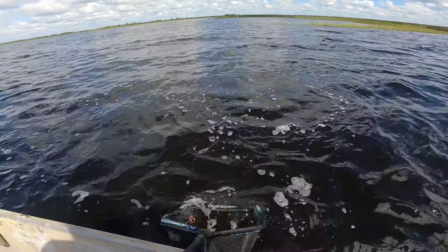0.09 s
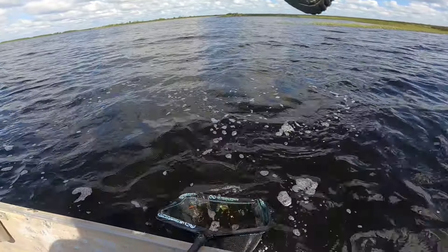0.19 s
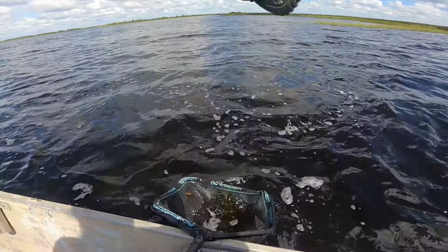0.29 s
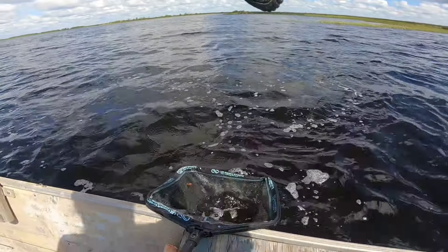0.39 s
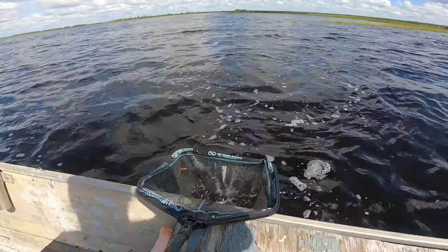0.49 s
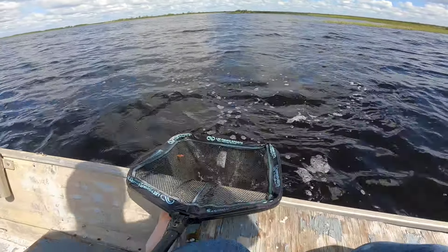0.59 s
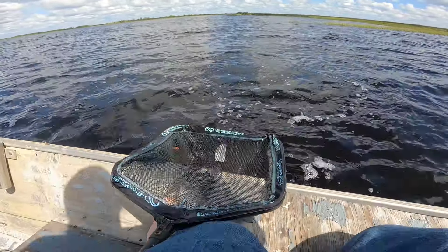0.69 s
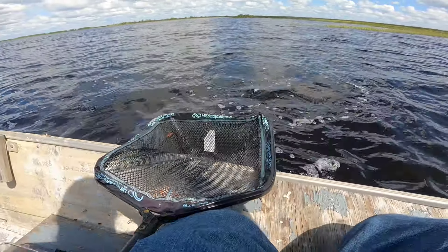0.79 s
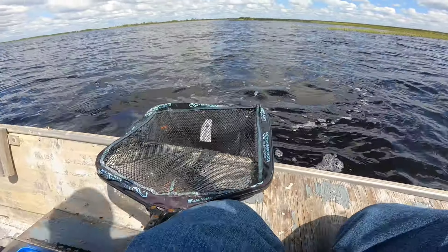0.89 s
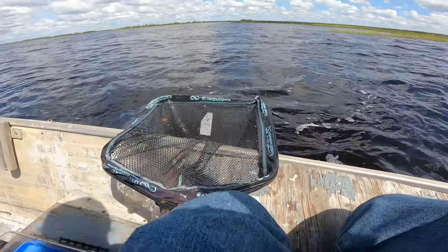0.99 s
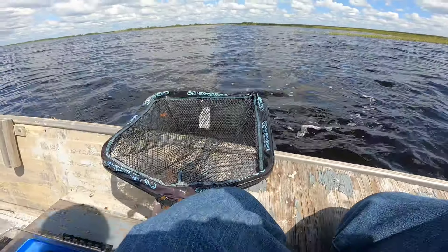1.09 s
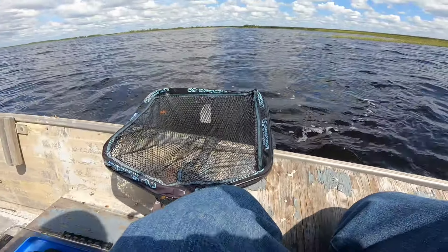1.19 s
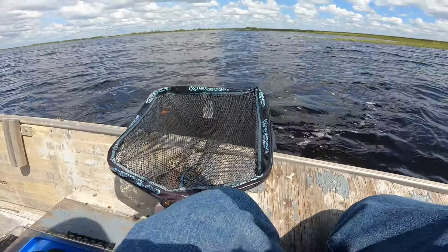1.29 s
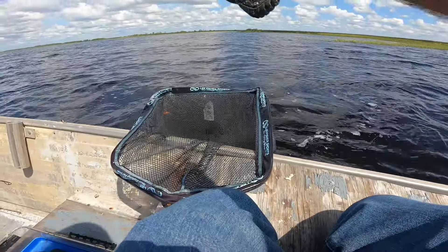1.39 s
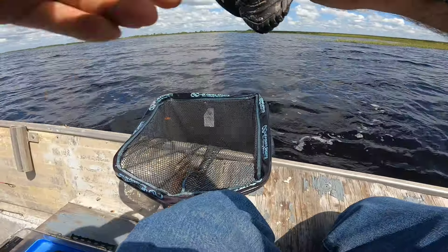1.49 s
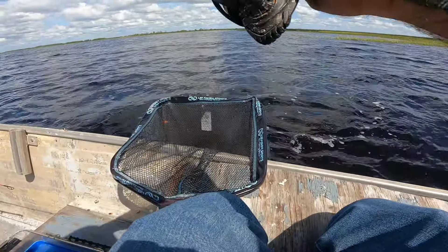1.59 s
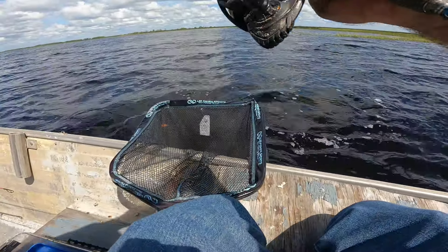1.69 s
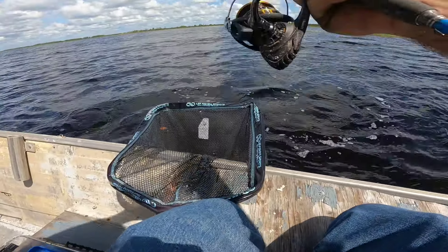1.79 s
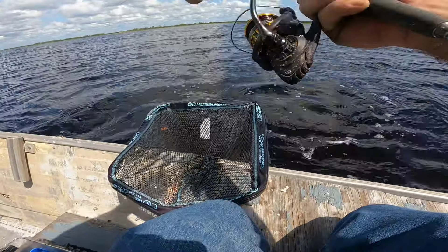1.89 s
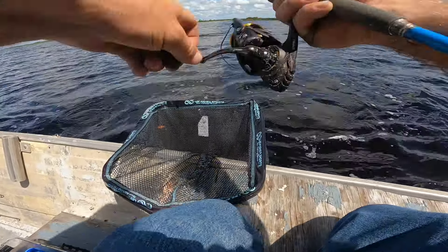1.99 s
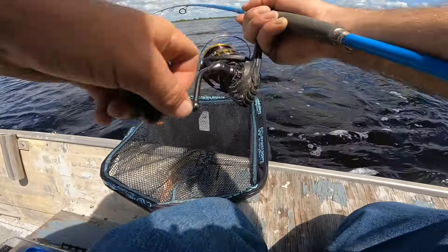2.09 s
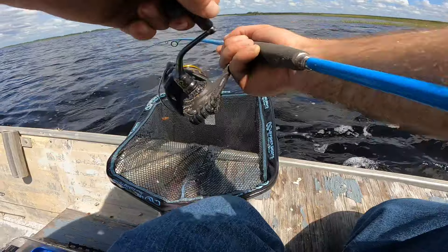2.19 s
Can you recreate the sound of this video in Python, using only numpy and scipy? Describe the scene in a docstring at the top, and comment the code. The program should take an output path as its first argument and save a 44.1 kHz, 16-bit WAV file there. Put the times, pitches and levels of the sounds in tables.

```python
"""On a small wooden boat, a landing net with a fish in it is dragged in over the rail, close by.
The hull rumbles on the water. The handle scrapes, water runs off the net and the wet mesh slaps.
The hoop knocks across the rail and the fish thumps and bounces on the deck, making the wood ring.
Then a fishing reel clicks and is wound, its gears rubbing and catching."""
import sys
import numpy as np
from scipy import signal
from scipy.fft import rfft, irfft
from scipy.io import wavfile

SR = 44100
rng = np.random.default_rng(int(sys.argv[2]) if len(sys.argv) > 2 else 0)


def master_out(mix):
    """Clip the mix to full scale and print it as 16-bit PCM to the path in sys.argv[1]."""
    frames = np.transpose(np.atleast_2d(mix))
    ceiling = np.clip(frames, -1, 1)
    pcm = np.round(ceiling * 32767).astype(np.int16)
    wavfile.write(sys.argv[1], SR, pcm)


N = 97020  # 2.2 seconds


def undb(db):
    """Turn decibels into a number to multiply by."""
    return 10 ** (np.asarray(db) / 20)


def unit(x):
    """Scale a sound to an average (rms) level of 1."""
    return x / np.sqrt(np.mean(x ** 2) + 1e-18)


def clock():
    """The time of every sample, in seconds."""
    return np.arange(N) / SR


def curve(rows):
    """Join (seconds, dB) points into a volume curve, silent before the first."""
    return undb(np.interp(clock(), *np.array(rows).T, left=-200))


def colour(x, points, tilt_db=0):
    """Shape the tone by (Hz, dB) points; a tilt above 0 dB per octave brightens it."""
    octave = np.log2(np.maximum(np.fft.rfftfreq(len(x), 1 / SR), 1))
    hz, db = np.array(points).T
    gain_db = np.interp(octave, np.log2(hz), db) + tilt_db * (octave - 10)
    return irfft(rfft(x) * undb(gain_db), len(x))


def band(x, low_hz, high_hz):
    """Gently turn down everything below low_hz and above high_hz."""
    for hz, kind in ((low_hz, "high"), (high_hz, "low")):
        x = signal.sosfilt(signal.butter(2, min(hz, SR / 2 - 10), kind, fs=SR, output="sos"), x)
    return x


def add(out, start, x):
    """Mix a sound in at a time in seconds."""
    i = max(int(start * SR), 0)
    out[i:i + len(x)] += x[:max(N - i, 0)]


def grains(per_s, spread_db):
    """Tiny impacts of uneven size at random times."""
    hits = (rng.random(N) < per_s / SR) * rng.standard_normal(N)
    return unit(hits * undb(spread_db * rng.standard_normal(N)))


def fade(t, ring_s):
    """Die away by 60 dB over the ring time."""
    return np.exp(-np.log(1000) * t / max(ring_s, 1e-4))


def ring(notes):
    """One tap rings an object's own notes; neighbouring notes swing opposite ways."""
    t = clock()[:N // 3]
    return unit(sum((-1) ** k * undb(db) * np.sin(2 * np.pi * hz * t) * fade(t, ring_s)
                    for k, (hz, db, ring_s) in enumerate(notes)))


def pings(count, start, end, db, low_hz, high_hz, cycles, glide=0):
    """Short notes at random times and pitches; glide bends them upward, like a bubble's note."""
    out, t = np.zeros(N), clock()[:N // 10]
    for k, (when, pitch, size) in enumerate(rng.random((count, 3))):
        hz = low_hz * (high_hz / low_hz) ** pitch
        life = cycles / hz
        phase = 2 * np.pi * hz * (t + glide * np.minimum(t, life) ** 2 / life / 2)
        note = np.sin(phase) * fade(t, life) * (1 - fade(t, life / 10))
        add(out, start + (end - start) * (k + when) / count, undb(db) * 2 * size * note)
    return out


# The tone of the water and of the hull's rumble. Each row: frequency in Hz, level in dB.
WATER_TONE = [(20, 6), (60, 1.5), (130, 6.5), (250, 4.5), (500, -12.5), (1000, -25), (2000, -18),
              (4000, -31), (8000, -40), (10000, -35), (15500, -66)]
RUMBLE_TONE = [(15, 6.5), (30, -7), (55, -5.5), (90, 0.5), (160, -13), (400, -28.5), (2000, -94)]
# Swells nudging the hull. Each row: middle in seconds, level in dB, pitch in Hz, fade time in seconds.
HULL_NUDGES = [(0.04, -36, 36.6, 0.018), (0.569, -40, 74.6, 0.069), (1.675, -35.5, 49, .025),
               (1.747, -29, 47, 0.014), (1.849, -36, 37, 0.017), (1.973, -35, 84.5, 0.0086)]

def hull():
    """The hull rumbles on faintly washing water, and swells give it a few soft nudges."""
    t = clock()
    out = undb(-58) * unit(colour(rng.standard_normal(N), WATER_TONE))
    out += undb(-47) * unit(colour(rng.standard_normal(N), RUMBLE_TONE))
    for middle, db, hz, fade_s in HULL_NUDGES:
        shape = np.exp(-((t - middle) / fade_s) ** 2)
        out += undb(db) * np.sqrt(2) * np.sin(2 * np.pi * hz * (t - middle)) * shape
    return out


# The tone of water streaming off the net. Each row: frequency in Hz, level in dB.
STREAM_TONE = [(120, -6), (200, 0), (249, -1), (315, 0.5), (940, -8.5), (1010, -12), (1260, -11.5),
               (3250, -15), (6480, -26), (15500, -59)]
# How loud the stream is. Each row: time in seconds, level in dB.
STREAM_LEVEL = [(0.3, -49.5), (0.48, -41), (0.58, -42), (0.68, -37), (0.79, -36.5), (0.85, -45),
                (0.96, -51.5), (1.15, -54), (1.38, -64), (1.7, -53.5), (1.88, -52.5)]

def runoff():
    """Water gurgles round the rising net, streams from it and thins to drops."""
    gurgle = pings(count=20, start=0, end=0.27, db=-31, low_hz=400, high_hz=1923, cycles=147, glide=0.11)
    drips = pings(count=20, start=0.91, end=0.98, db=-60,
                  low_hz=870, high_hz=6400, cycles=42, glide=0.13)
    stream = unit(colour(grains(per_s=10000, spread_db=0.43), STREAM_TONE))
    return gurgle + drips + stream * curve(STREAM_LEVEL)


# The tone of the rubbing gears. Each row: frequency in Hz, level in dB.
GEAR_TONE = [(60, -11), (130, 0.5), (280, -6), (500, -15.5), (1400, -14), (1900, -10.5), (2900, -11),
             (4000, -11.5), (5000, -16), (6400, -31.5), (7600, -29), (8600, -25.5), (9250, -30),
             (10200, -36.5), (15500, -45)]
# The notes of the reel's body. Each row: pitch in Hz, level in dB, ring time in seconds.
REEL_NOTES = [(2490, 7, 0.048), (2860, -6, 0.058), (2820, 10.5, 0.11), (3040, 7, 0.077), (3280, -13, .06),
              (3370, -12, 0.025), (4360, -16, 0.03)]
# How loud the gears rub and the body rings. Each row: time in seconds, level in dB.
GEAR_LEVEL = [(1.87, -83), (1.90, -48), (1.99, -39), (2.05, -41.5), (2.12, -43.5), (2.19, -38.5)]
REEL_BODY_LEVEL = [(1.88, -65), (1.895, -46), (1.93, -43), (1.97, -45), (2.04, -45.5), (2.12, -48),
                   (2.19, -47)]

def reel():
    """The gears rub unevenly and ring the reel's body; teeth catch and small metal parts tinkle."""
    flutter = undb(unit(band(rng.standard_normal(N), 24, 88)))  # the level wavers by about 1 dB
    rub = unit(grains(per_s=15000, spread_db=0.91) * flutter)
    grit = undb(-6.5) * grains(per_s=350, spread_db=1.9)
    gears = unit(colour(rub + grit, GEAR_TONE))
    body = unit(signal.fftconvolve(grains(per_s=1500, spread_db=3.4), ring(REEL_NOTES))[:N])
    teeth = pings(count=30, start=1.92, end=2.2, db=-37, low_hz=2350, high_hz=4700, cycles=26)
    tinkle = pings(count=10, start=1.92, end=2.2, db=-51, low_hz=7800, high_hz=9700, cycles=150)
    return gears * curve(GEAR_LEVEL) + body * curve(REEL_BODY_LEVEL) + teeth + tinkle


# Clicks of the hoop, reel and tackle, and one faint high tick of a drip. Each row: start in seconds,
# peak level in dB, pitch in Hz, ring time in seconds, how much louder the snap is than the rattle in dB.
SMALL_CLICKS = [(0.395, -22.5, 1980, 0.019, -2), (0.457, -19.5, 3220, 0.0061, -15),
                (0.4565, -21.5, 5630, 0.013, 4), (0.5793, -53, 11100, .008, 0),
                (0.8085, -25.5, 2410, 0.024, -7), (0.940, -41, 2950, 0.022, 6),
                (1.0256, -21, 3520, 0.022, -4), (1.140, -33, 2790, 0.023, 8), (1.623, -46, 3520, 0.024, 7),
                (1.68, -38.5, 5140, 0.027, -5), (1.6925, -30, 3000, 0.017, -13),
                (1.7131, -31, 5170, 0.016, -1.5), (1.726, -27, 2494, 0.018, -2),
                (1.854, -31, 2450, 0.011, 4), (1.8917, -25.5, 2700, 0.015, 11),
                (1.903, -31, 2720, 0.022, 11), (1.915, -27, 2700, 0.029, 3),
                (1.9267, -23.5, 2710, 0.022, 18), (1.9613, -30.5, 2730, .025, 10),
                (2.021, -27.5, 3870, 0.023, 3), (2.032, -16, 3530, 0.008, -1.5),
                (2.033, -28, 7560, 0.004, 3), (2.059, -34, 9100, 0.028, -6.5),
                (2.1705, -26.5, 2720, 0.015, -9)]

def clicks():
    """The hoop, reel and tackle click and one drip ticks, each a pitched snap with a brief rattle."""
    out, t = np.zeros(N), clock()[:N // 20]
    rise_s = 0.00053
    for start, db, hz, ring_s, snap_db in SMALL_CLICKS:
        shape = fade(t, ring_s) * (1 - np.exp(-(t / rise_s) ** 2))
        rattle = band(rng.standard_normal(len(t)) * shape, hz * 0.63, hz * 0.65)
        rattle = unit(band(rattle, hz * 0.66, 4600))
        snap = unit(np.sin(2 * np.pi * hz * t) * shape)
        click = rattle + undb(snap_db) * snap
        add(out, start, undb(db) * click / np.abs(click).max())
    return out


# The notes of the handle on the rail. Each row: pitch in Hz, level in dB, ring time in seconds.
HANDLE_NOTES = [(236, -1, 0.15), (388, -1, 0.089), (460, -6.5, 0.12), (535, -8.5, 0.19), (567, -8.5, .13),
                (941, -11, 0.2), (994, -0.5, 0.13), (1449, -8.5, 0.094), (1550, -19.5, 0.088),
                (1673, -20.5, 0.29), (1797, -18.5, 0.061)]
# The tone of its scrape. Each row: frequency in Hz, level in dB.
SCRAPE_TONE = [(60, -47.5), (130, -4.5), (190, -17), (250, 1), (310, -13.5), (400, -6.5), (580, -10),
               (790, -20), (1020, -7.5), (1200, -17.5), (1490, -15.5), (2230, -28.5), (3100, -28.5),
               (5500, -41.5), (6100, -29.5), (6900, -40.5), (7600, -32), (9000, -51), (12000, -55),
               (15500, -79)]
# How loud it scrapes and rings; the ring grows with the load. Each row: time in seconds, level in dB.
HANDLE_SCRAPE_LEVEL = [(0, -33.5), (0.06, -32.5), (0.16, -33), (0.26, -35), (0.30, -37), (0.36, -44.5),
                       (0.46, -60), (0.56, -70), (0.7, -59)]
HANDLE_RING_LEVEL = [(0, -53), (0.06, -36.5), (0.15, -35), (0.20, -31.5), (0.27, -25), (0.31, -45),
                     (0.36, -47.5), (0.46, -38.5), (0.56, -50.5), (0.7, -86)]

def handle():
    """The handle sticks and slips over the rail in tiny jerks that set it ringing."""
    body = unit(signal.fftconvolve(grains(per_s=900, spread_db=0.81), ring(HANDLE_NOTES))[:N])
    scrape = unit(colour(grains(per_s=12000, spread_db=0.33), SCRAPE_TONE))
    return scrape * curve(HANDLE_SCRAPE_LEVEL) + body * curve(HANDLE_RING_LEVEL)


# Slaps of the wet mesh. Each row: loudest moment in seconds, level in dB, rise time in seconds,
# fall time in seconds, tilt towards the treble in dB per octave.
MESH_SLAPS = [(0.015, -38, 0.0037, 0.011, 13), (0.261, -33.5, 0.0039, 0.028, 0.5),
              (0.366, -24, .002, 0.027, -4.5), (0.393, -27, 0.0051, 0.017, 4),
              (0.462, -20.5, 0.0074, 0.011, 3), (0.81, -33.5, 0.0035, 0.0078, 4.5),
              (1.0276, -24, 0.0058, 0.012, 3.5), (1.245, -61, 0.016, 0.051, 6),
              (1.434, -31.5, 0.0064, 0.019, 1), (1.4665, -28, 0.00084, 0.017, 3)]
# The tone of the mesh. Each row: frequency in Hz, level in dB.
MESH_TONE = [(100, -19.5), (500, 10.5), (1100, 6), (2000, -4.5), (3300, -5), (4500, -15), (6000, -16),
             (8000, -23.5), (10000, -43), (13000, -47.5), (16000, -66)]
# The notes of the net's hoop. Each row: pitch in Hz, level in dB, ring time in seconds.
HOOP_NOTES = [(1103, -4, 0.17), (1248, 2, 0.13), (1517, 2, 0.082), (1838, 2.5, 0.1), (2177, 4, 0.036),
              (2413, -3, 0.099), (2980, -7, .07), (3286, 2, 0.036), (4180, -3, 0.028), (5920, -7, .05)]

def mesh():
    """Wet netting bunches and slaps in bursts of tiny clicks, and shakes the hoop into ringing."""
    slaps, shake, t = np.zeros(N), np.zeros(N), clock()
    for crest, db, rise, fall, tilt_db in MESH_SLAPS:
        shape = undb(db) * np.exp(-np.maximum((crest - t) / rise, (t - crest) / fall))
        slaps += shape * unit(colour(grains(per_s=14000, spread_db=0.56), MESH_TONE, tilt_db))
        shake += shape
    hoop = ring(HOOP_NOTES)
    taps = shake * grains(per_s=2700, spread_db=1)
    return slaps + undb(-10.5) * signal.fftconvolve(taps, hoop / np.linalg.norm(hoop))[:N]


def through_planks(x, path_m):
    """A blow travels as a bend in the wood: below corner_hz, the lower the note, the later it arrives."""
    corner_hz, delay_s_per_m = 1492, 0.00614
    size = 2 * len(x)
    hz = np.maximum(np.fft.rfftfreq(size, 1 / SR), 20)
    delay_s = path_m * delay_s_per_m * np.maximum(np.sqrt(corner_hz / hz) - 1, 0)
    phase = 2 * np.pi * np.cumsum(delay_s) * SR / size
    return irfft(rfft(x, size) * np.exp(-1j * phase), size)[:len(x)]


# The hull's many notes, so close together that they blur. Each row: frequency in Hz, level in dB.
HULL_BLUR_TONE = [(40, 8), (100, 13.5), (250, 13), (500, 5), (1000, -1.5), (2000, -34), (5000, -29.5),
                  (16000, -48)]

def blows(rows, notes, push_db, blur_db):
    """Each blow sends a first push through the wood, then rings its notes and the hull's blur of notes."""
    out, t = np.zeros(N), clock()[:N // 3]
    push_hz, blur_rise_s = 313, 0.0012
    fade_in_s = 0.0008  # a brief fade-in keeps each blow's start smooth
    push = unit(np.sin(2 * np.pi * push_hz * t) * fade(t, ring_s=0.0038))
    wood = ring(notes) + undb(push_db) * push
    for start, db, low_hz, high_hz, path_m in rows:
        blur = colour(rng.standard_normal(len(t)), HULL_BLUR_TONE)
        blur = unit(blur * fade(t, ring_s=0.32) * (1 - np.exp(-t / blur_rise_s)))
        blow = band(wood + undb(blur_db) * blur, low_hz, high_hz)
        blow = through_planks(blow, path_m) * (1 - np.exp(-(t / fade_in_s) ** 2))
        peak = np.abs(signal.hilbert(blow)).max()
        add(out, start, undb(db) * blow / peak)
    return out


# The notes of the rail. Each row: pitch in Hz, level in dB, ring time in seconds.
RAIL_NOTES = [(74.4, -8.5, 0.66), (99, -16.0, 0.5), (156.34, -3.5, 0.63), (233, 6, 0.13), (263, -4.5, 0.15),
              (291.3, -7.5, 0.41), (394, -13, 0.028), (445.4, -2, 0.22), (538, -12.5, 0.26),
              (623.7, -2.0, 0.23), (729, -14, 0.27), (914, -5.5, 0.13), (1017, -13.5, 0.11),
              (1275, -10.0, 0.16)]
# Knocks of the hoop. Each row: start in seconds, peak level in dB, lowest and highest frequency in Hz,
# path through the wood in metres.
HOOP_KNOCKS = [(0.276, -2.7, 194, 522, 0.48), (0.3149, -18, 92, 400, 0.39), (0.361, -13.5, 102, 1058, 0.32),
               (0.3772, -12, 425, 681, 0.32), (0.3832, -13, 304, 769, 0.33), (0.3913, -9.5, 224, 635, 0.29),
               (0.3978, -15.5, 276, 360, 0.317), (0.4613, -19, 358, 2030, 0.32),
               (0.4741, -19.5, 448, 813, 0.373)]

def hoop_on_rail():
    """The hoop knocks its way across the wooden rail and sets it ringing."""
    return blows(HOOP_KNOCKS, RAIL_NOTES, push_db=-2, blur_db=-5.5)


# The notes of the deck. Each row: pitch in Hz, level in dB, ring time in seconds.
DECK_NOTES = [(53.7, -14.5, 1.17), (79.9, -5, 0.38), (133.7, -16, 0.25), (154.7, -5, 0.41),
              (192.1, 6, 0.19), (237.5, -4, 0.33), (268, -2.5, 0.24), (294.6, -11, 0.13),
              (392.8, -2.5, 0.2), (460, -8.5, 0.27), (520, -16, 0.52), (780, -20, 0.19), (950, -9.5, 0.26),
              (1412, -10, 0.11)]
# Thumps of the fish and net. Each row: start in seconds, peak level in dB, lowest and highest
# frequency in Hz, path through the wood in metres.
FISH_THUMPS = [(0.2893, -21, 53, 170, 0.54), (0.4011, -20, 85, 155, 0.514), (0.7912, -19.5, 62, 94.5, 0.45),
               (0.8093, -26, 215, 280, 0.33), (0.9809, -32, 130, 920, 0.38), (1.0192, -20, 480, 1023, 0.18),
               (1.0235, -6, 141, 355, 0.17), (1.061, -24, 28, 85, 0.46), (1.4285, -14.5, 190, 1090, 0.33),
               (1.4359, -8, 117, 352, 0.517), (1.4421, -16, 50, 84, 0.5), (1.4886, -17.5, 150, 190, 0.39),
               (1.5408, -30, 90, 115, 0.55)]

def fish_on_deck():
    """The netted fish lands and bounces, and the deck planks boom under it."""
    return blows(FISH_THUMPS, DECK_NOTES, push_db=-5.1, blur_db=-3)


# The tone of a faint smeared copy. Each row: frequency in Hz, level in dB compared with the middle.
SMEAR_TONE = [(25, -24), (60, -60), (300, -76.5), (600, -52), (1200, -33.5), (2500, -38.5), (5000, -25),
              (9000, -17.5), (12000, -1.5)]

def scene():
    """Everything is straight ahead; a faint smeared copy, mostly high treble, adds stereo width."""
    middle = hoop_on_rail() + fish_on_deck() + mesh() + handle() + runoff() + clicks() + reel() + hull()
    smear = rng.standard_normal(N // 200)  # 11 milliseconds long
    smeared = signal.fftconvolve(middle, smear / np.linalg.norm(smear))[:N]
    side = colour(smeared, SMEAR_TONE)
    return np.array([middle + side, middle - side])


def record(dry):
    """Add faint microphone hiss and cut off the very highest treble."""
    hiss = undb(-85) * rng.standard_normal(dry.shape)
    top_hz = 15700
    return signal.sosfilt(signal.ellip(8, .2, 80, top_hz, fs=SR, output="sos"), dry + hiss)


dry = scene()
out = record(dry)
master_out(out)
```